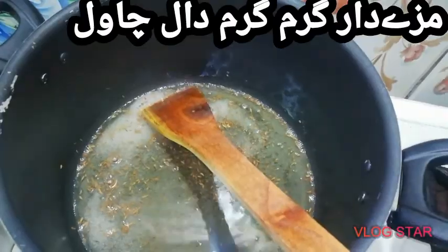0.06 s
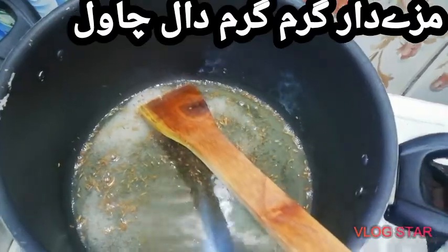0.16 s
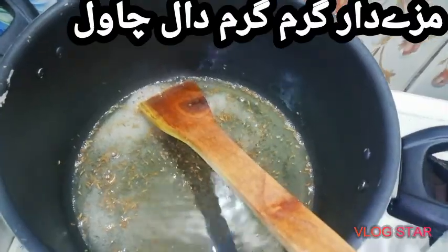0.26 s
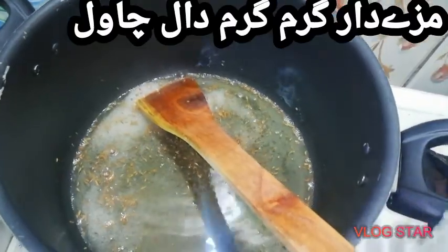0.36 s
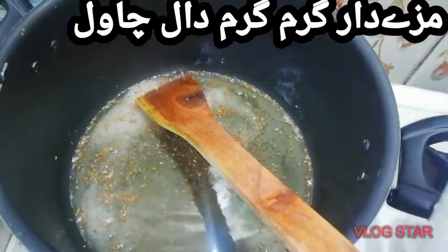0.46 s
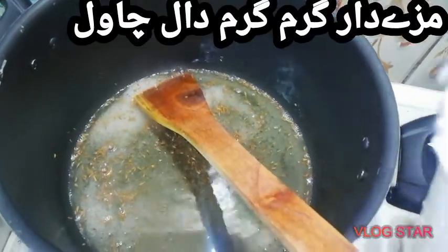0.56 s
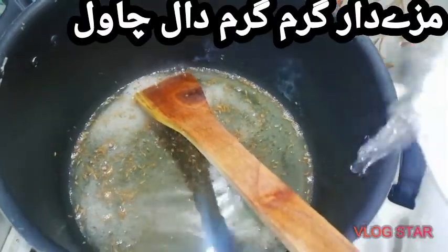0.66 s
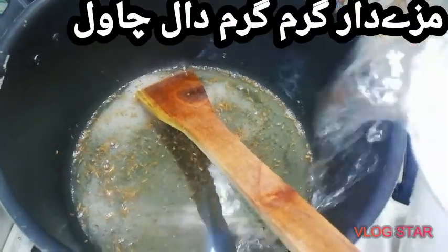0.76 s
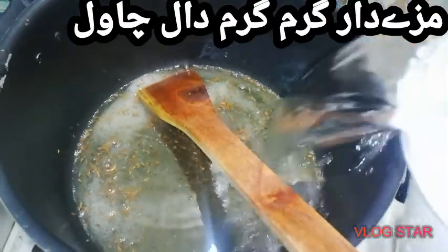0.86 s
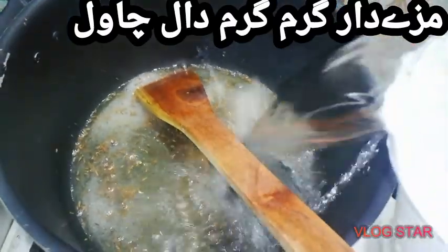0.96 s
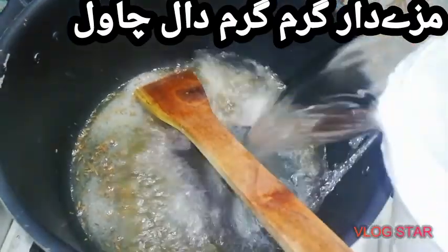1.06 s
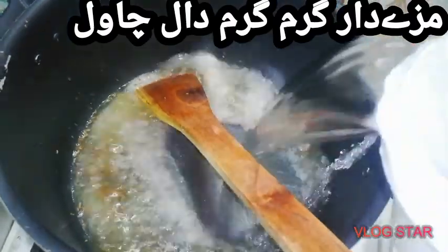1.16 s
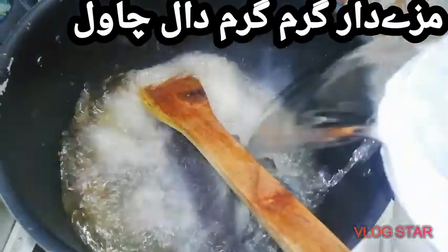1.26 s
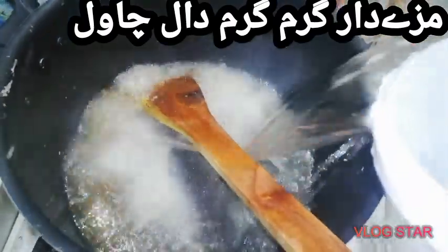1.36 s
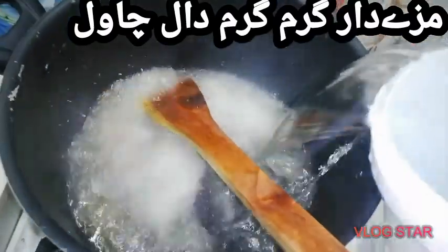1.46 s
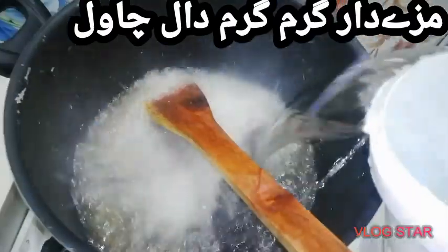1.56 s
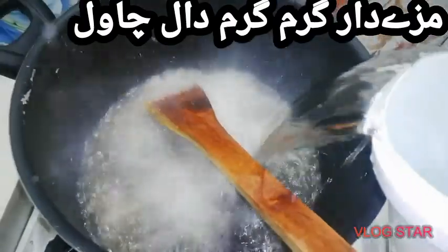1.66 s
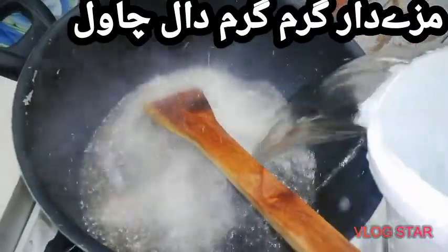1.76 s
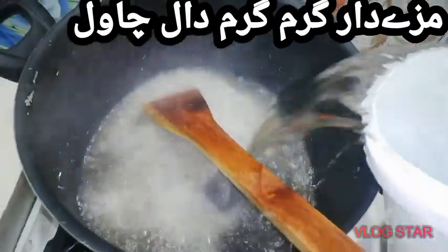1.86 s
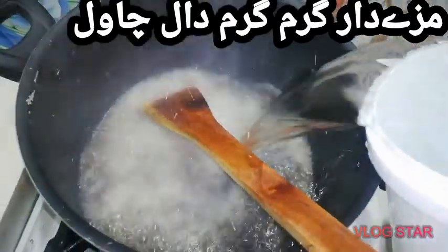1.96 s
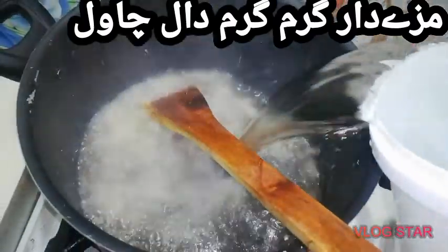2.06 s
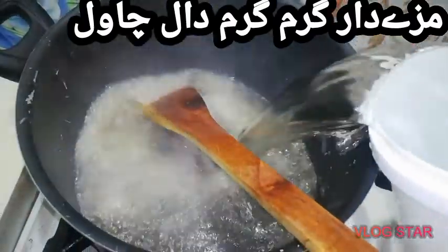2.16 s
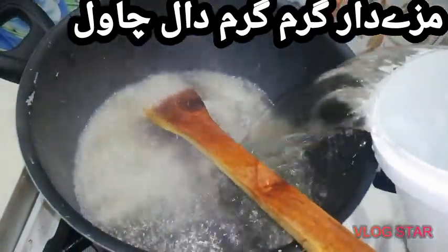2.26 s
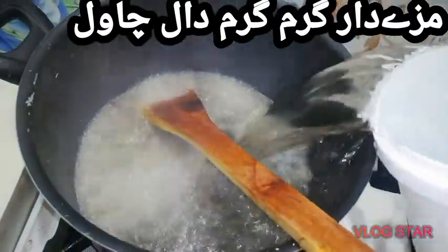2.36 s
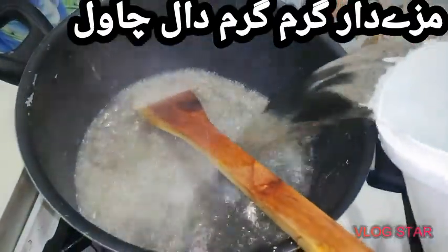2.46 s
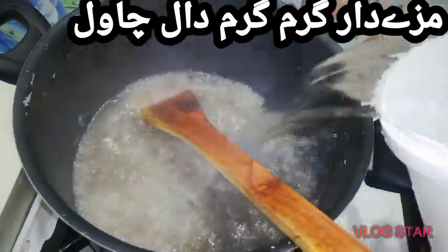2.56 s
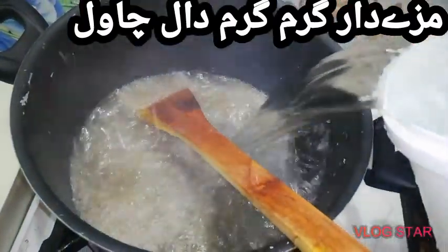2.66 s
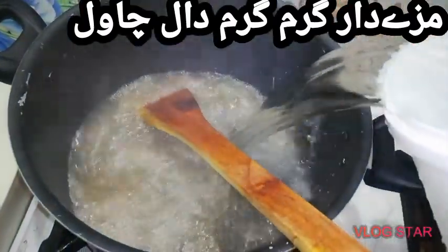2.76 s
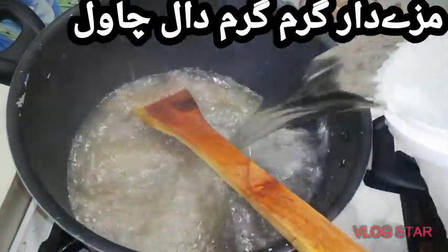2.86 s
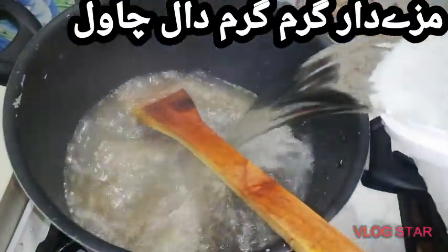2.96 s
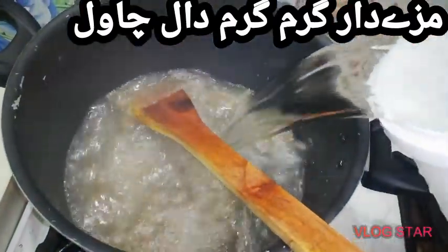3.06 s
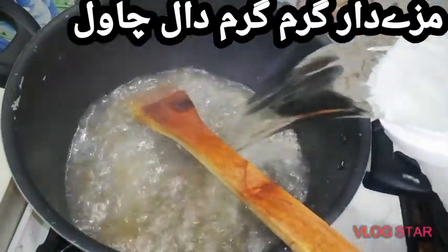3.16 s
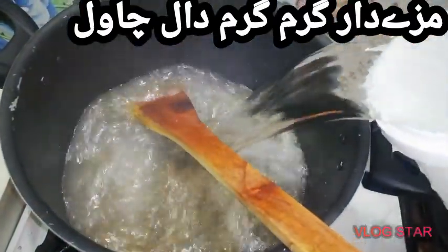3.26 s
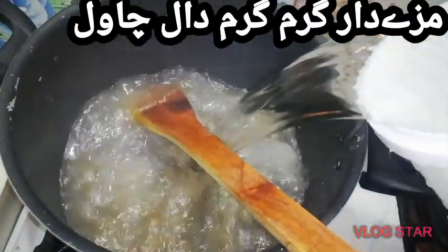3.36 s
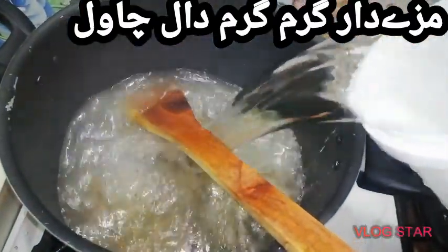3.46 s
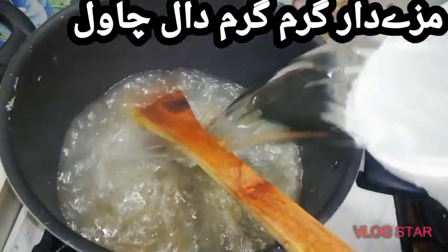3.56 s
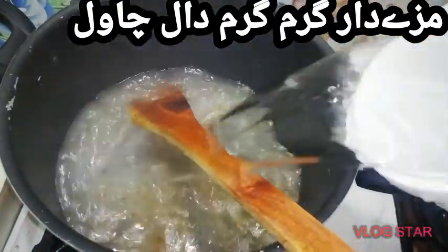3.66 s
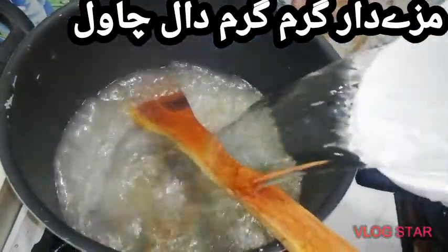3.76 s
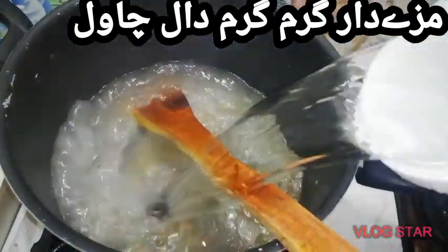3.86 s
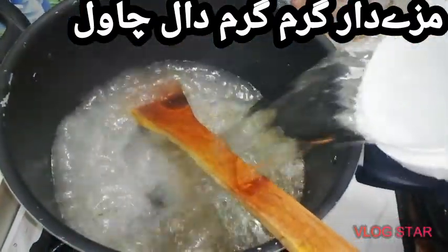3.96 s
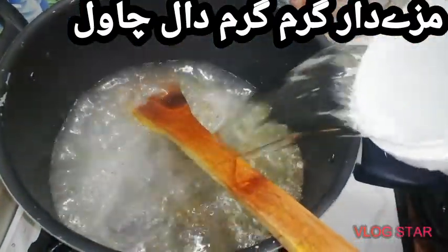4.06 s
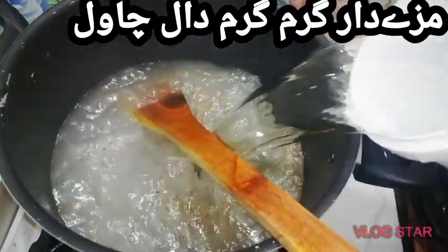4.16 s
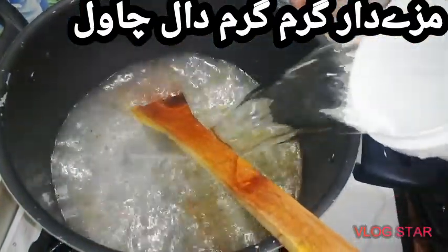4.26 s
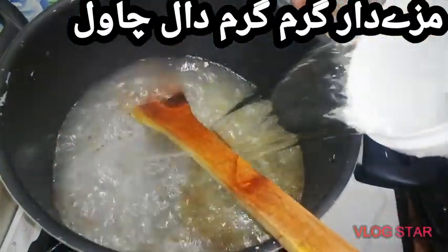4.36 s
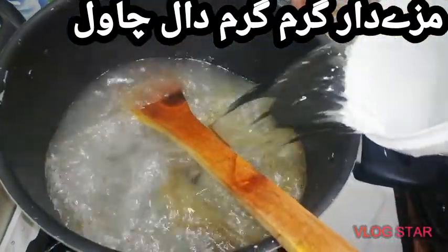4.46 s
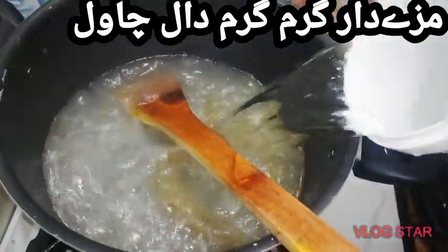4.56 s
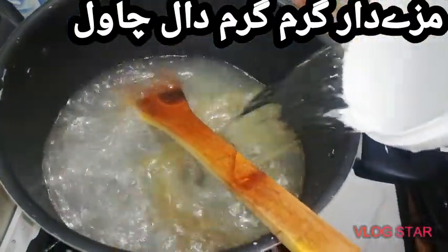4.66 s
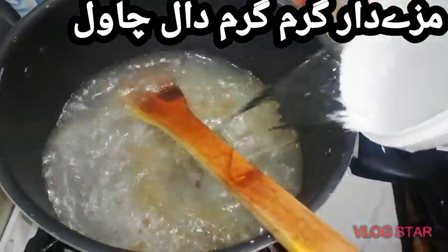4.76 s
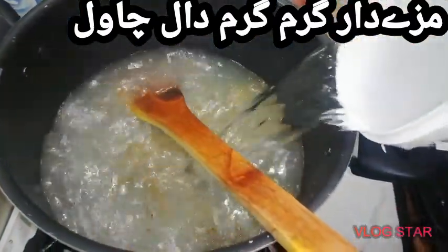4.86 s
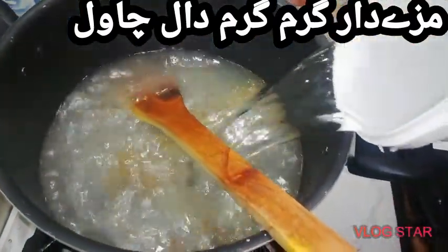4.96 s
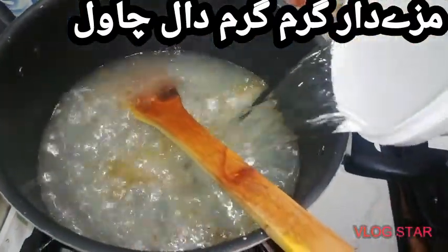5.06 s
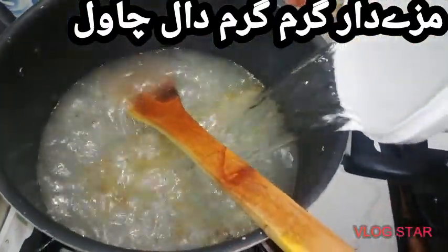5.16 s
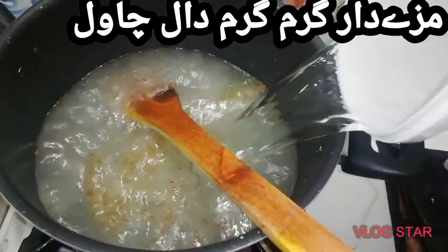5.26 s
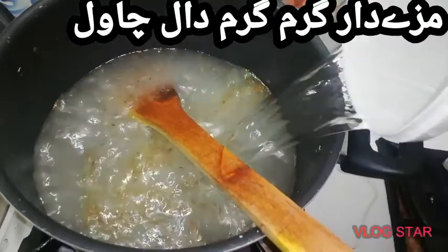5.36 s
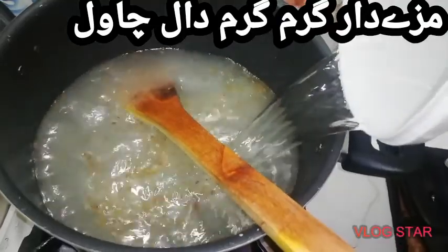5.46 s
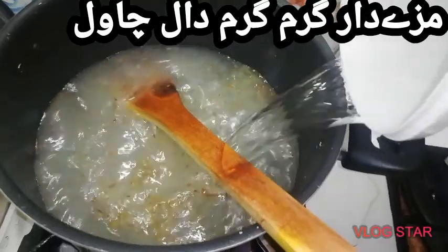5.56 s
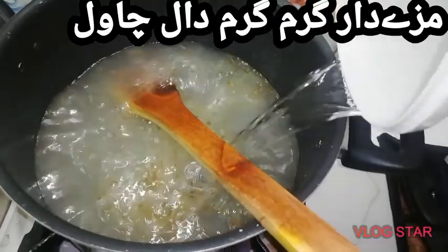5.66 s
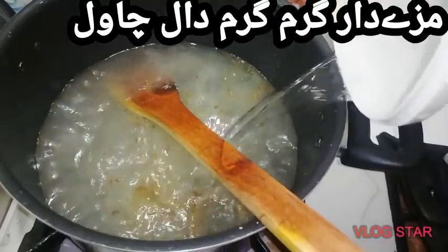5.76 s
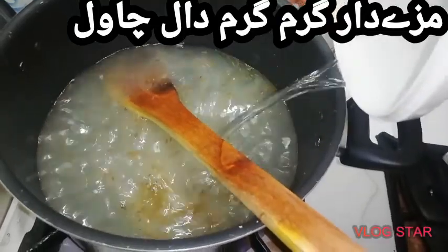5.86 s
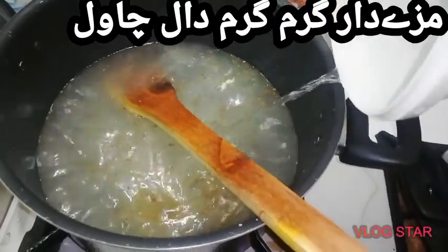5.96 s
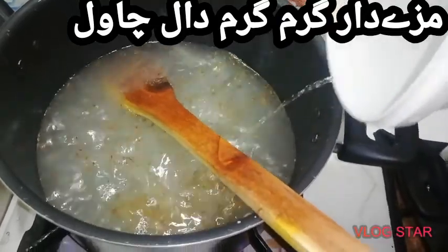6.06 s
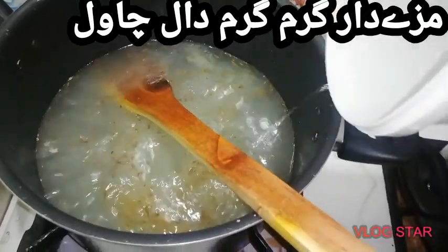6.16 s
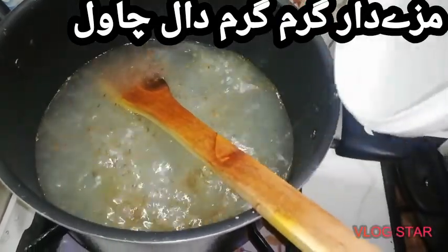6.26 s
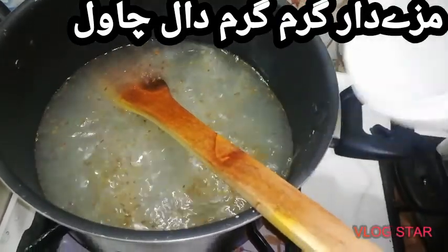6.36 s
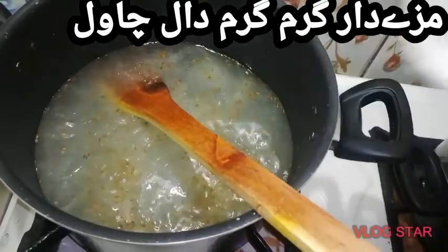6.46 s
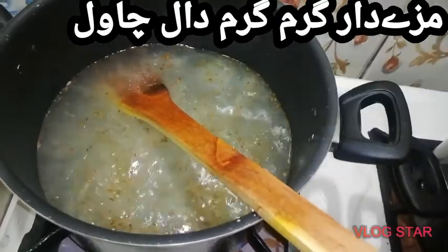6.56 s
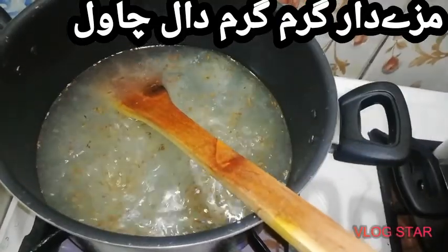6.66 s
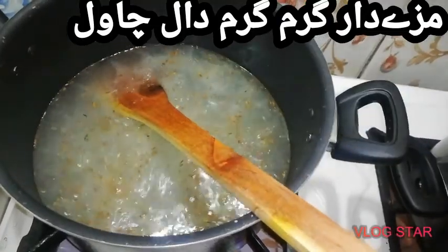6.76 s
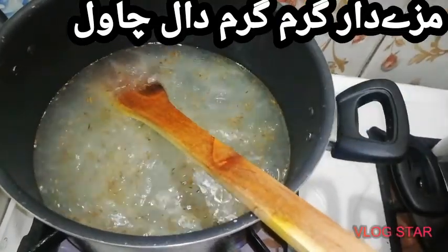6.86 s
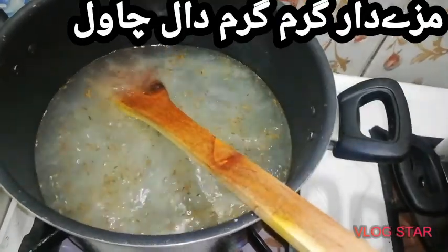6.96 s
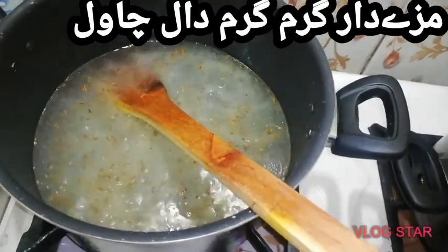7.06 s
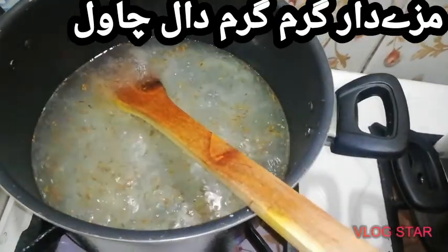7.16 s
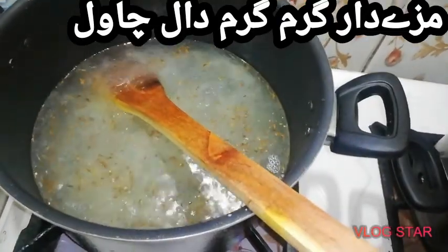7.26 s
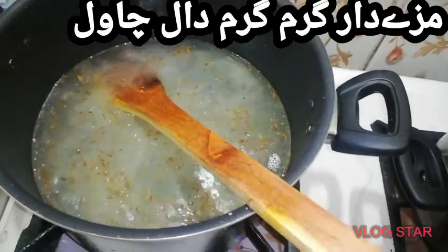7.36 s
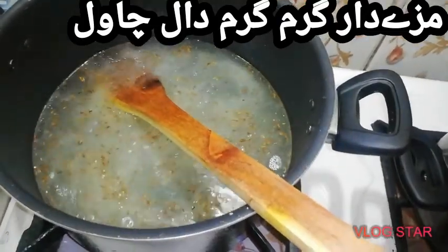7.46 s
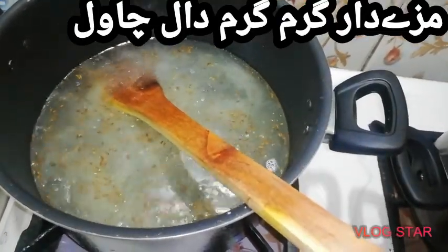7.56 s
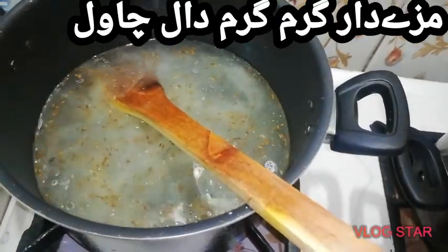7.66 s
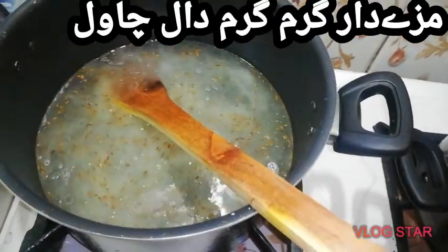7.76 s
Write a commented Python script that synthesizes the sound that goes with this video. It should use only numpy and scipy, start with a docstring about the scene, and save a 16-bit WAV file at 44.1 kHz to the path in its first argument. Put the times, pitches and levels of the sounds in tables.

```python
"""Water poured into frying oil

Water is poured from a jug into a metal pot of gently frying oil, close to a hand-held camera.
It flashes to steam: dense random bursts, filtered by the pot's resonances, then thinning as the oil cools.
Ringing bubbles, plunging water, snapping films and short noise cracks (spits) stand out from the sizzle.
The hand on the camera gives pressure steps and noise rubs; one dull modal knock comes near the end."""
import sys
import numpy as np
from scipy import signal
from scipy.fft import rfft, irfft
from scipy.io import wavfile

SR = 44100
rng = np.random.default_rng(int(sys.argv[2]) if len(sys.argv) > 2 else 0)


def inscribe(sig):
    """Save sig as 16-bit PCM at rate SR to the path in sys.argv[1].

    A 1-D sig is mono; a 2-D sig holds one channel per row.
    Samples are clipped to [-1, 1] before scaling.
    """
    pcm = np.round(np.clip(np.atleast_2d(sig).T, -1, 1) * 32767)
    wavfile.write(sys.argv[1], SR, pcm.astype(np.int16))


N = 344156
TIME = np.arange(N) / SR
TAPS = 4096
BINS = np.fft.rfftfreq(TAPS, 1 / SR)
LANDS_S = .841  # the water reaches the oil
POPS_FROM_S = 3.3  # single pops and blips stand out once the foam has sunk


def amp(db):
    """Decibels to gain."""
    return np.exp(np.asarray(db) * (np.log(10) / 20))


def unit(x):
    """Scales a sound so that the mean of its channels has rms 1."""
    return x / np.sqrt(np.mean(np.atleast_2d(x).mean(0) ** 2) + 1e-20)


def curve(rows, axis=1):
    """One column of a time table at every sample."""
    rows = np.array(rows)
    return np.interp(TIME, rows[:, 0], rows[:, axis])


def shape(rows, axis=1):
    """One column of a spectrum table at every filter bin, on a log frequency scale."""
    rows = np.array(rows)
    return np.interp(np.log(BINS + 1), np.log(rows[:, 0]), rows[:, axis])


def convolve(x, taps):
    """Passes each channel through its impulse response."""
    x = np.atleast_2d(x).astype(np.float32)
    taps = np.atleast_2d(taps).astype(np.float32)
    return signal.oaconvolve(x, taps, axes=1)[:, :N].astype(float)


def colour(x, db):
    """Minimum-phase filter with the given gain at each bin, so that clicks keep their sharp start."""
    log_gain = np.log(amp(np.maximum(db, -100)))
    circle = np.concatenate([log_gain, log_gain[-2:0:-1]])
    taps = np.fft.ifft(np.exp(np.conj(signal.hilbert(circle)))).real
    return convolve(x, taps)


def add(mix, s, sound):
    """Mixes a sound in at time s."""
    part = mix[..., max(round(s * SR), 0):][..., :sound.shape[-1]]
    part += sound[..., :part.shape[-1]]


def clicks(per_s, spread_db):
    """Random clicks of steady mean power, with exponentially spread levels and random signs."""
    chance = np.broadcast_to(per_s / SR, N)
    at = np.flatnonzero(rng.random(N) < chance)
    size = amp(spread_db * np.minimum(rng.exponential(1, len(at)), 5))
    out = np.zeros(N)
    out[at] = size * rng.choice([-1, 1], len(at)) / np.sqrt(chance[at])
    return unit(out)


def surge(per_s, depth_db):
    """Random gain with about per_s turning points a second."""
    knots = np.cumsum(rng.uniform(.5, 1.5, 2000)) / per_s - 1
    return amp(depth_db * np.interp(TIME, knots, rng.standard_normal(len(knots))))


def swell(s, width_s, db):
    """Gain that moves to a passing peak or dip around time s."""
    return amp(db * np.exp(-((TIME - s) / width_s) ** 2))


def strokes(rows, attack_s, release_s):
    """Gain of overlapping strokes (start s, length s, dB): each rises, holds and dies away."""
    power = np.zeros(N)
    for s, length, db in rows:
        t = TIME[:round((length + 10 * release_s) * SR)]
        rise = np.minimum(t / attack_s, 1)
        fall = np.exp(-np.maximum(t - length, 0) / release_s)
        add(power, s, (amp(db) * rise * fall) ** 2)
    return np.sqrt(power)


def above(hz, steepness):
    """Share of the power that a soft crossover at hz sends upward."""
    return 1 / (1 + (hz / (BINS + 1)) ** steepness)


def resonate(x, hz, width):
    """A one-pole resonance of gain 1 that follows the curve hz."""
    turn = np.exp(2j * np.pi * np.cumsum(hz) / SR)
    r = np.exp(-np.pi * width / SR)
    return 2 * (turn * signal.lfilter([1 - r], [1, -r], x / turn)).real


def echoes(length_s, gap_s, t60):
    """Dense dying reflections of unit energy, different at each microphone."""
    t = np.arange(round(length_s * SR)) / SR
    tail = rng.standard_normal((2, len(t))) * amp(-60 * t / t60) * (t > gap_s)
    return tail / np.linalg.norm(tail, axis=1, keepdims=True)


def walls(x, t60=0.046, walls_db=-1):
    """One spot in the pot heard at two microphones: the direct path and quick wall echoes."""
    path = amp(walls_db) * echoes(.04, .0007, t60)
    path[0, rng.integers(8, 30)] += 1
    path[1, 0] += .6  # the right microphone faces away
    return convolve(x, path)


def at_ports(x, db):
    """Gives pot sound a spectrum, the pot's resonances, its width and each microphone's colour."""
    # Resonances of the pot and its air. Each row: frequency in Hz, width in Hz, peak gain in dB.
    pot_modes = [(171, 37, 9), (296, 47, 11), (349, 51, 9), (483, 26, 12.5), (546, 23, 10), (807, 35, 2.5),
                 (988, 96, 3), (1057, 33, 4.5), (1620, 29, -0.5), (2100, 240, 1.5), (3270, 240, 1.2)]
    # Low notes reach both microphones alike. Each row: frequency in Hz, gain of the side signal in dB.
    side_gain = [(100, -21), (300, -13), (650, -1), (1050, -10), (1400, -13.5), (2400, 0)]
    # Microphone colour. Each row: frequency in Hz, left gain in dB, right gain in dB.
    port_gain = [(312, -6.5, -2.5), (1040, -0.5, -3), (1490, 0.5, -1.5), (1980, -2, -9.5), (3100, -1, -5.5),
                 (4300, -0.5, -2), (6400, 0, 0.5), (8030, -2, -1), (9240, 2.5, -2), (10500, 5, -8.5),
                 (11400, 4.5, -14), (12800, -3, -0.5), (16000, -3.5, -5.5)]
    pot_db = sum(peak / (1 + (2 * (BINS - hz) / width) ** 2) for hz, width, peak in pot_modes)
    mid = (x[0] + x[1]) / 2
    side = colour((x[0] - x[1]) / 2, shape(side_gain))
    left = colour(mid + side, db + pot_db + shape(port_gain, axis=1))
    right = colour(mid - side, db + pot_db + shape(port_gain, axis=2))
    return np.vstack([left, right])


def bursts(per_s, share, spread_db, smooth_db, count=10, drift_per_s=.7):
    """Drops burst in a patch that wanders round the pot, over the smooth rush of their steam."""
    # Spectrum of one burst. Each row: frequency in Hz, gain in dB.
    burst_gain = [(100, -38), (250, -28), (420, -25), (600, -29), (670, -20.5), (780, -18), (900, -14),
                  (1100, -7), (1350, -5.5), (1800, -1.5), (3500, -2), (5500, -5.5), (8000, -4.5),
                  (11000, -5), (13000, -12.5), (16000, -20)]
    drops = clicks(per_s, spread_db)
    spot = np.floor(count * (drift_per_s * TIME + .5 * rng.random(N))) % count
    popping = unit(sum(walls(drops * (spot == k)) for k in range(count)))
    steam = amp(smooth_db) * unit(rng.standard_normal((2, N)))
    return unit(at_ports(popping + steam, shape(burst_gain) + 10 * np.log10(share + 1e-10)))


def follow(full_db, share, start_db, rise_s):
    """Gain of a layer that builds up after the water lands, then sinks by its share of the boil's fall."""
    # The water boils off as it cools the oil. Each row: time in seconds, level relative to full boil in dB.
    boil_level = [(1.0, -0.5), (1.05, 1.5), (1.13, -1.58), (1.19, -1.62), (1.21, 1.32), (1.245, 1.33),
                  (1.27, -1.2), (1.42, 0.82), (1.75, -0.35), (2.5, -0.5), (3.26, -2.5), (3.3, -5),
                  (3.45, -4), (3.97, -6.5), (4.21, -9), (4.33, -12.5), (4.8, -16), (5.55, -21.5),
                  (6.12, -23.5), (6.22, -22), (6.31, -26), (7.8, -31.5)]
    age = np.maximum(TIME - LANDS_S, 0)
    return amp(full_db + share * curve(boil_level) + start_db * np.exp(-age / rise_s))


def bubble(hz, cycles, glide=0.094):
    """A bubble rings for some cycles and rises in pitch as it nears the surface."""
    t = np.arange(900) / SR
    age = hz * t / cycles
    return np.exp(-age) * np.sin(2 * np.pi * hz * t * (1 + glide * np.tanh(age / 3)))


def cluster(length_s, hz, cycles, count, spread_octaves=0.287):
    """A gulp of air breaks into bubbles of scattered pitch; the whole has a fixed energy."""
    out = np.zeros(TAPS)
    for when, pitch, size in rng.random((count, 3)):
        bubble_hz = hz * 2 ** (spread_octaves * (4 * pitch - 2))
        add(out, length_s * when ** 2, (size + .5) * bubble(bubble_hz, cycles))
    return out * np.sqrt(.01 * SR / np.sum(out ** 2))


def kitchen(air_db=-57.5, hum_hz=343, hum_db=-54, hum_ends_s=0.42):
    """Low room noise, partly shared by the microphones, and a faint hum that dies before the pour."""
    # Spectrum of the room noise. Each row: frequency in Hz, gain in dB.
    air_gain = [(30, -4.5), (150, -8), (350, -7.5), (520, -20), (1500, -15.5), (6000, -32), (16000, -43)]
    air = unit(colour(rng.standard_normal((2, N)) + rng.standard_normal(N), shape(air_gain)))
    hum = np.sin(2 * np.pi * hum_hz * TIME)
    return amp(air_db) * air + strokes([(0, hum_ends_s, hum_db)], attack_s=0.0037, release_s=.03) * hum


def frying(level_db=-55):
    """The oil ticks quietly by itself, in very fine bubbles."""
    tick_db = shape([(500, -16), (1200, -8), (1800, -5), (3300, -0.5), (5500, -0.5), (10000, 1.0), (16000, 4)])
    gain = amp(level_db + curve([(0.14, 1), (0.22, -1.5), (4.0, -6.5)]))
    return gain * bursts(1500, amp(tick_db) ** 2, spread_db=3.0, smooth_db=3.0, count=2)


def squeezes():
    """The hand squeezes the camera and lets go: each is one slow full sine swing of pressure."""
    # Each row: start in seconds, length in seconds, signed peak pressure (full scale 1).
    squeeze_rows = [(4.42, 0.057, -0.025), (4.738, 0.075, -0.016), (5.858, 0.12, 0.037),
                    (6.45, 0.082, 0.031), (6.612, 0.095, 0.066), (7.371, 0.064, 0.023)]
    out = np.zeros(N)
    for s, length, height in squeeze_rows:
        u = np.arange(0, 1, 1 / (length * SR))
        add(out, s, height * np.sin(2 * np.pi * u))
    return out


def through_case(x, lag_s=0.00063, soft_hz=480):
    """A jolt meets the right microphone first, and the left one a little later and softer."""
    late = np.interp(TIME - lag_s, TIME, x[0])
    return np.array([signal.lfilter(*signal.butter(1, soft_hz, fs=SR), late), x[-1]])


def finger(tick_db=3):
    """A finger rubs (filtered clicks) and catches (single ticks) on the case by the right microphone."""
    # Spectrum of rubs and ticks. Each row: frequency in Hz, gain in dB.
    rub_gain = [(80, -9), (300, 9), (700, 0.5), (1500, 4.5), (2500, -3.5), (5000, -21), (12000, -46)]
    # Each row: start in seconds, length in seconds, relative level in dB.
    rub_rows = [(.18, 0.13, -58), (.44, 0.14, -51)]
    # Each row: time in seconds, relative peak in dB.
    tick_rows = [(0.186, -40), (0.193, -42), (0.215, -34), (0.235, -40), (0.243, -36), (0.32, -43),
                 (0.335, -40), (0.436, -37), (0.464, -38), (0.493, -35), (0.51, -37), (0.539, -38.5),
                 (0.556, -41), (0.584, -37), (0.819, -40)]
    rubbing = unit(colour(clicks(220, spread_db=-0.5), shape(rub_gain)))
    rub = strokes(rub_rows, attack_s=0.0099, release_s=0.044) * rubbing
    tick = colour(np.eye(1, TAPS), shape(rub_gain))[0]
    ticks = np.zeros(N)
    for s, db in tick_rows:
        add(ticks, s, amp(db + tick_db) * tick / abs(tick).max())
    return (rub + ticks) * amp([[-11], [2]])  # left, right


def handling(leak_hz=55, thump_db=5.0, slips_per_s=170, apart_db=-18):
    """The grip slips in small pressure steps that leak away in a few milliseconds, and rumbles."""
    # Thumps of the hand on the camera. Each row: time in seconds, relative signed pressure step.
    thump_rows = [(0.188, -0.046), (0.333, 0.0088), (0.508, 0.031), (0.898, 0.049), (1.2586, 0.19),
                  (1.5007, -0.14), (1.6652, 0.19), (3.835, 0.04), (4.556, -0.031), (4.722, -0.021),
                  (4.789, 0.01), (4.896, -0.088), (4.9056, -0.19), (4.9864, -0.046), (5.049, 0.038),
                  (5.241, 0.083), (5.275, 0.052), (5.369, -0.04), (5.7172, 0.051), (6.013, 0.01),
                  (6.224, 0.048), (6.2471, -0.038), (6.2823, 0.04), (6.313, -0.017), (6.4836, -0.18),
                  (6.622, 0.044), (6.712, -0.16), (6.974, 0.042), (7.002, 0.048), (7.007, -0.014),
                  (7.053, -0.032), (7.1632, 0.029), (7.303, 0.03), (7.375, -0.053), (7.448, -0.023),
                  (7.57, 0.016), (7.7747, 0.041)]
    # How the camera body passes a thump. Each row: frequency in Hz, gain in dB.
    body_gain = [(10, -4.5), (40, -0.5), (280, 0.5), (520, 5.5), (1100, -0.5), (1700, 1), (3000, -10),
                 (8000, -50)]
    # The grip shifts and rumbles. Each row: start in seconds, length in seconds, level in dB.
    grip_rows = [(0, 0.76, -47), (.17, 0.022, -36), (.23, 0.018, -37), (.31, 0.016, -38), (.43, 0.018, -38),
                 (.485, 0.028, -34), (.61, 0.078, -42), (.81, .03, -37), (1.7, 0.054, -40),
                 (1.92, 0.025, -38), (4.22, 0.39, -48.5), (4.41, .05, -42), (4.53, .03, -37),
                 (4.72, 2.93, -44), (4.76, 0.027, -40), (4.98, 0.045, -32), (5.11, 0.047, -34.5),
                 (5.29, 0.023, -35), (5.345, .03, -35), (5.45, .045, -36.5), (5.54, 0.032, -36.5),
                 (5.6, 0.057, -49), (5.72, .06, -57), (5.87, 0.035, -33), (6.075, 0.099, -41.5),
                 (6.22, .03, -45), (6.5, 0.25, -35.5), (6.82, 0.035, -38), (6.91, 0.15, -36.5),
                 (7.37, 0.1, -40.5), (7.72, 0.061, -44)]
    # Spectrum of the rumble. Each row: frequency in Hz, gain in dB.
    grip_gain = [(12, -3.5), (22, 5), (40, -4.5), (110, -8.5), (210, -14.5), (350, -22.5), (500, -21),
                 (1000, -28.5), (3000, -93)]
    steps = np.zeros(N)
    for s, height in thump_rows:
        add(steps, s, np.array([height]))
    leaked = signal.lfilter(*signal.butter(1, leak_hz, "high", fs=SR), np.cumsum(steps))
    thumps = colour(leaked, shape(body_gain))
    # nearly alike at both microphones
    slips = clicks(slips_per_s, spread_db=0.7) + amp(apart_db) * rng.standard_normal((2, N))
    slipping = unit(colour(slips * surge(10, depth_db=2.5), shape(grip_gain)))
    rumble = strokes(grip_rows, attack_s=0.003, release_s=0.028) * slipping
    return through_case(amp(thump_db) * thumps + rumble + squeezes()) + finger()


def drip(at_s=.754, hz=3500, level_db=-37):
    """One drop pings just ahead of the pour: a clean ringing bubble."""
    out = np.zeros(N)
    add(out, at_s, amp(level_db) * bubble(hz, cycles=11, glide=0.018))
    return walls(out, walls_db=-11)


def splash(width_hz=1100):
    """The first gushes dig into the oil: a ragged slosh whose note falls unevenly as the hole deepens."""
    # Each row: time in seconds, resonance in Hz, level in dB.
    gush_rows = [(.85, 2600, -64), (.874, 2080, -40), (.93, 1660, -44), (.945, 1800, -37),
                 (.975, 1180, -40), (.995, 2000, -32), (1.04, 1690, -36), (1.075, 1870, -46),
                 (1.11, 1250, -37.5), (1.2, 1080, -29), (1.3, 1050, -90)]
    drops = walls(clicks(1200, spread_db=5.0), walls_db=-0.5)
    hz = curve(gush_rows)
    slosh = resonate(resonate(drops, hz, width_hz), hz, width_hz)
    slosh = unit(at_ports(slosh, shape([(700, -16), (1300, -7), (2100, -6.5), (8000, 0)])))
    return amp(curve(gush_rows, axis=2)) * surge(50, depth_db=3) * slosh


def sizzle(bursts_per_s=12000, hollow_db=1, hollow_hz=110, simmer_db=-62, crackle_rise_s=0.062):
    """Fine droplets flash first; larger drops and deep boiling follow as the water piles in."""
    # The pot's hollow rings under the boiling, at a shifting pitch. Each row: time in seconds, resonance in Hz.
    hollow_rows = [(2.6, 1016), (3.3, 1040), (3.7, 980), (4.2, 960), (5.1, 1070)]
    per_s = bursts_per_s * follow(0, share=.88, start_db=-16, rise_s=.12)
    finest, fine = above(11960, steepness=21.7), above(5250, steepness=5.9)
    medium, low = above(1430, steepness=7.26), above(615, steepness=8.25)
    foam_cover_s, foam_cover_width_s = 2.18, 0.94  # foam damps the spray and thickens the crackle

    mist = bursts(per_s, finest, spread_db=3.0, smooth_db=-3, count=2)
    mist = follow(-28.5, share=1.3, start_db=-14, rise_s=0.1) * mist
    fizz = bursts(per_s, fine * (1 - finest), spread_db=3.0, smooth_db=-11.0)
    fizz = follow(-21.5, share=1.017, start_db=-28, rise_s=0.044) * fizz
    flash = swell(0.99, width_s=0.2, db=4.5)  # the first water flashes into extra fine spray
    spray = flash * swell(foam_cover_s, foam_cover_width_s, db=-2.5) * (mist + fizz)

    crackle = bursts(.6 * per_s, medium * (1 - fine), spread_db=3.0, smooth_db=-10)
    crackle = follow(-22.0, share=0.98, start_db=-35.0, rise_s=0.11) * crackle
    crackle = crackle * swell(foam_cover_s, foam_cover_width_s, db=1.5)
    crackle = crackle * np.clip((TIME - LANDS_S) / crackle_rise_s, 0, 1)

    boil = bursts(.25 * per_s, low * (1 - medium), spread_db=3.5, smooth_db=-9, count=4)
    boil = unit(boil + amp(hollow_db) * resonate(boil, curve(hollow_rows), hollow_hz))
    boil = follow(-31.5, share=1.13, start_db=-59, rise_s=0.086) * boil
    boil = boil * swell(1.68, width_s=0.52, db=5.5)  # the foam boils up to its height

    churn_gain = np.hypot(follow(-41, share=1.9, start_db=-27, rise_s=0.2), amp(simmer_db))
    churn_share = above(215, steepness=2.8) * (1 - low)
    churn = churn_gain * bursts(600, churn_share, spread_db=2.0, smooth_db=0, count=1)

    fine_part = spray * surge(25, depth_db=0.5) + crackle * surge(30, depth_db=0.8)
    return fine_part + boil * surge(25, depth_db=0.9) + churn * surge(15, depth_db=0.5)


def bubbles(low_hz=1900, high_hz=7500, spread_db=11, length_s=.012, cycles=3.8, count=560):
    """Small bubbles come up in clusters all over the pot, and outlast the sizzle."""
    # Colour of bubbles in the pooled water. Each row: frequency in Hz, gain in dB.
    bubble_gain = [(600, -4), (1100, -8), (1300, -8), (1560, 0), (1750, -4.5), (2300, -1), (2950, 1),
                   (3190, 3), (3450, -0.5), (3900, -2.5), (5000, -6.5), (7500, 2)]
    spots = np.zeros((8, N))
    for k, (when, pitch, size) in enumerate(rng.random((count, 3))):
        gulp = cluster(length_s, low_hz * (high_hz / low_hz) ** pitch, cycles, count=3)
        add(spots[k % len(spots)], (k + when) / count * TIME[-1], amp(spread_db * size ** 2) * gulp)
    sound = unit(at_ports(sum(walls(spot, walls_db=-4) for spot in spots), shape(bubble_gain)))
    return follow(-31.5, share=0.71, start_db=-31, rise_s=0.053) * sound


def spits(decay_s=0.00068, focus_db=7, level_db=3):
    """A trapped drop explodes: a very short noise crack, brightest around its own pitch."""
    # Single loud spits of oil. Each row: time in seconds, relative peak in dB, brightest frequency in Hz.
    spit_rows = [(0.845, -14, 9850), (0.858, -6, 11000), (0.8663, -7, 11000), (0.887, -2, 9000),
                 (1.663, 2.5, 10700), (3.6, -2.5, 10500), (3.822, -7, 3600), (3.957, -4, 10500),
                 (4.494, -7, 11100), (4.7164, -10, 11000), (5.0042, -18, 10900), (5.346, -16, 10000),
                 (6.0, -25, 6700), (6.082, -27, 3840), (6.1365, -17, 8400), (6.157, -17, 2500),
                 (6.211, -13, 3600), (6.328, -22, 10050), (6.371, -16, 10400), (6.4348, -14, 5460),
                 (6.729, -36, 5500), (6.737, -31, 10500), (6.85, -31, 4180), (7.053, -24, 3500),
                 (7.199, -24.5, 4000), (7.2646, -26, 3170), (7.417, -26, 10300), (7.505, -20, 9500),
                 (7.576, -24.5, 6500)]
    t = np.arange(TAPS) / SR
    out = np.zeros(N)
    for s, db, hz in spit_rows:
        hump = amp(-focus_db * np.log2((BINS + 1) / hz) ** 2) + 0.056 * above(2000, steepness=4)
        crack = irfft(rfft(rng.standard_normal(TAPS)) * hump) * np.exp(-t / decay_s)
        add(out, s, amp(db + level_db) * crack / abs(crack).max())
    spit_db = shape([(400, -26), (1000, -8.0), (7000, -5.0), (10500, 1.0), (16000, -12)])
    return at_ports(walls(out, walls_db=-5.5), spit_db)


def plunge():
    """The full jet drags air deep under the pooled water, with a lower, hollow rush."""
    # Each row: time in seconds, level in dB.
    jet_level = [(2.8, -90), (3.25, -38), (3.6, -41), (3.9, -39.5), (4.15, -41), (4.4, -52), (4.7, -61),
                 (5.2, -94)]
    # Spectrum of the rush. Each row: frequency in Hz, gain in dB.
    jet_gain = [(300, -29), (700, -15), (850, 0), (1050, -5), (1250, 0.5), (1550, 0.5), (2000, -4),
                (4000, -24)]
    gain = amp(curve(jet_level)) * surge(18, depth_db=5.5)
    return gain * unit(at_ports(walls(clicks(1800, spread_db=2.0), t60=0.014), shape(jet_gain)))


def blips(low_hz=1400, high_hz=5000, cycles=11, level_db=-44, spread_db=8, fade_db_per_s=-0.5, count=150):
    """Single clean bubbles ping on the open water."""
    out = np.zeros(N)
    for when, pitch, size in rng.random((count, 3)):
        age = when * (TIME[-1] - POPS_FROM_S)
        gain = amp(level_db + spread_db * size ** 2 + fade_db_per_s * age)
        add(out, POPS_FROM_S + age, gain * bubble(low_hz * (high_hz / low_hz) ** pitch, cycles))
    return walls(out, walls_db=2)


def pops(per_s=110, level_db=-50, fade_db_per_s=-2, build_s=0.67):
    """Films of oil snap on the open surface: sparse, dry, crisp ticks."""
    age = np.maximum(TIME - POPS_FROM_S, 0)
    snaps = sum(walls(clicks(per_s / 3, spread_db=3.0), walls_db=-6) for spot in range(3))
    snap_db = shape([(500, -15), (1200, 1), (2200, -4), (3800, -3), (6500, 3), (11000, -15), (16000, -15)])
    gain = np.minimum(age / build_s, 1) * amp(level_db + fade_db_per_s * (age - build_s))
    return gain * unit(at_ports(snaps, snap_db))


def gurgles(cycles=4.4):
    """The largest gulps of air, dragged under or boiling up: clusters of bubbles over six spots."""
    # Each row: start in seconds, length in seconds, relative level in dB, middle frequency in Hz.
    gulp_rows = [(3.864, .02, -21, 2290), (4.089, 0.011, -31, 2600), (4.143, 0.019, -22, 2330),
                 (4.203, 0.013, -22, 2540), (4.749, .02, -26.5, 2100), (4.785, 0.053, -30, 3200),
                 (4.874, 0.016, -25.5, 2100), (5.035, 0.022, -31, 2880), (5.105, 0.011, -31, 2030),
                 (5.131, 0.028, -27, 2850), (5.18, .014, -27.5, 2670), (5.423, 0.01, -30.5, 1740),
                 (5.556, .03, -29.5, 3120), (5.667, .02, -30, 3600), (5.703, 0.017, -34, 2100),
                 (5.768, 0.01, -40, 3450), (5.875, 0.034, -31.5, 3160), (5.997, 0.026, -38, 4240),
                 (6.062, 0.01, -42, 2530), (6.08, .012, -32.5, 3620), (6.192, .022, -36, 2500),
                 (6.235, 0.0081, -35, 3600), (6.279, .008, -44, 3420), (6.389, .022, -33, 2820),
                 (6.53, .025, -36.5, 3500), (6.575, .03, -37, 3400), (6.605, .012, -37, 4600),
                 (6.676, .012, -48, 2100), (6.746, 0.014, -40, 2400), (6.826, 0.0082, -48, 2400),
                 (6.849, .02, -37, 4100), (7.167, 0.0077, -36, 1900), (7.216, 0.012, -37, 1760),
                 (7.263, .012, -37, 2900), (7.29, .012, -37, 1110), (7.388, 0.015, -37, 2100),
                 (7.466, 0.029, -35, 4370), (7.607, 0.0092, -39, 1510), (7.669, 0.021, -35.5, 3100)]
    spots = np.zeros((6, N))
    for k, (s, length, db, hz) in enumerate(gulp_rows):
        gulp = cluster(length, hz, cycles, count=10, spread_octaves=0.18)
        add(spots[k % len(spots)], s, amp(db) * gulp)
    sound = sum(walls(spot, walls_db=-6.5) for spot in spots)
    return at_ports(sound, shape([(400, -19), (1000, -1), (1700, -1.0)]))


def knock(at_s=7.682, blow_db=-25, scuff_s=7.63, scuff_length_s=0.11, scuff_db=-44.5):
    """A scuff (noise) and a soft blow (impulse) ring the same few low modes."""
    # Each row: mode in Hz, width in Hz, relative level in dB.
    knock_modes = [(179, 130, 0), (341, 55, 6), (415, 70, -2), (502, 52, 4), (630, 110, -5)]
    power = sum(amp(db) ** 2 / (1 + (2 * (BINS - hz) / width) ** 2) ** 2 for hz, width, db in knock_modes)
    modes_db = 10 * np.log10(power)
    blow = np.zeros(N)
    add(blow, at_s, np.ones(1))
    blow = colour(blow, modes_db)
    scuff = strokes([(scuff_s, scuff_length_s, scuff_db)], attack_s=.012, release_s=0.026)
    return amp(blow_db) * blow / abs(blow).max() + scuff * unit(colour(rng.standard_normal(N), modes_db))


def filling(x, width_hz=110, level_db=-0.3):
    """Two air resonances, driven by the sound in the pot, climb as the water rises."""
    # First under the foam, then over open water. Each row: time in seconds, resonance in Hz, gain in dB.
    foam_rows = [(1.0, 1880, -5), (1.9, 1990, -6), (2.9, 2080, -12), (3.35, 2090, 1), (3.65, 2180, -9),
                 (4.15, 2270, -12), (4.7, 2300, -9), (5.2, 2320, -44)]
    open_rows = [(4.4, 1810, -37), (4.7, 1860, 6), (5.1, 1930, -2), (5.8, 1970, -2), (6.5, 2040, 1),
                 (7.2, 2110, -4), (7.8, 2140, 0)]
    rings = sum(amp(curve(rows, axis=2)) * resonate(x, curve(rows), width_hz) for rows in [foam_rows, open_rows])
    return amp(level_db) * (x + rings)


def room(x, t60=0.5, room_db=-11, count=3, half_turns_per_s=1.318):
    """Adds the short tail of the kitchen, rotating at a fixed rate between three random echo patterns."""
    wet = np.zeros_like(x)
    for k in range(count):
        feed = np.sqrt(2 / count) * np.cos(np.pi * (half_turns_per_s * TIME + k / count))
        wet += convolve(x * feed, echoes(.3, .007, t60))
    return x + amp(room_db) * wet


def scene():
    """The pot, with the boil from the instant the water lands, among the sounds at the camera."""
    # The right microphone is partly shaded from the pot. Each row: time in seconds, gain in dB.
    shade_rows = [(0.85, -2.5), (1.05, -3.5), (1.25, -1.5), (3.12, -2), (3.3, -6.5), (4.0, -6.5),
                  (4.5, -2.5), (6.0, -1), (7.8, -0.5)]
    landed = np.clip((TIME - LANDS_S) / 0.009, 0, 1)
    water = landed * (sizzle() + bubbles() * surge(35, depth_db=2.1))
    water = water + drip() + splash() + plunge() + gurgles() + blips()
    pot = room(filling(water + spits() + pops()) + frying())
    pot[1] *= amp(curve(shade_rows))
    return pot + handling() + knock() + kitchen()


def record(dry, edge_hz=15800):
    """Full-scale limit, then a low-pass band limit."""
    low_pass = signal.firwin(511, edge_hz, window=("kaiser", 9), fs=SR)
    return signal.oaconvolve(np.clip(dry, -1, 1), low_pass[None], "same")


dry = scene()
out = record(dry)
inscribe(out)
```